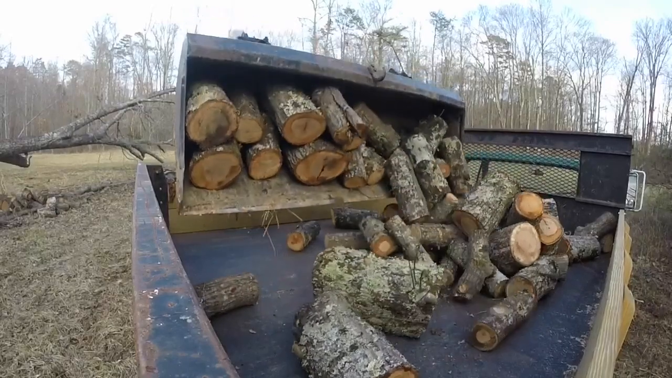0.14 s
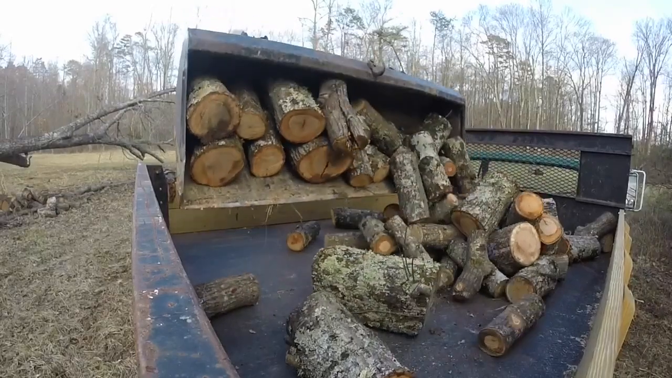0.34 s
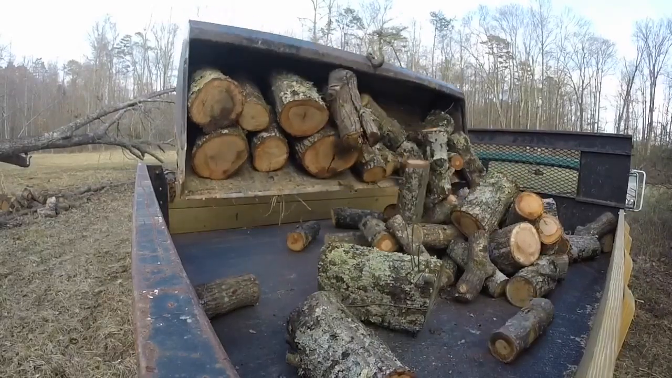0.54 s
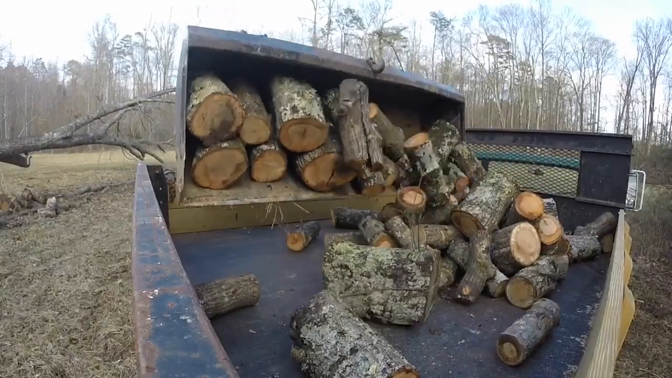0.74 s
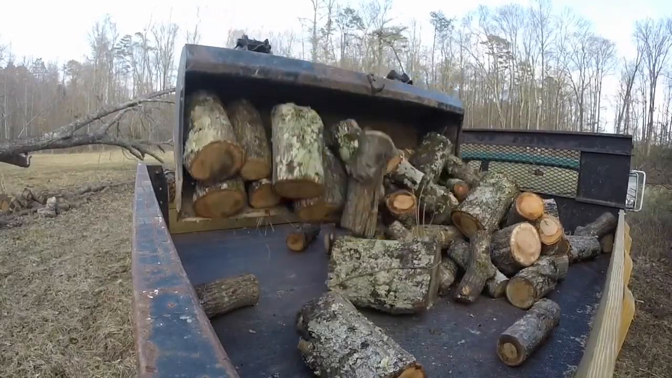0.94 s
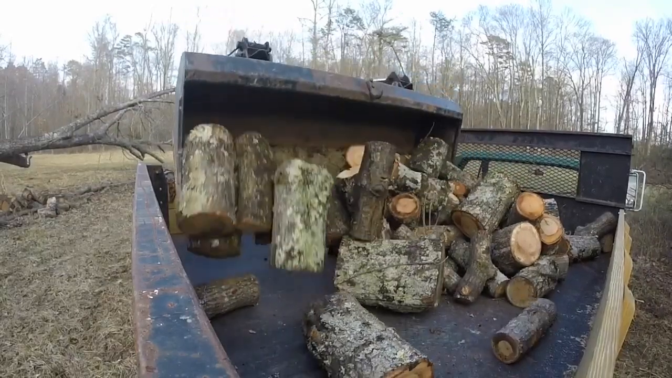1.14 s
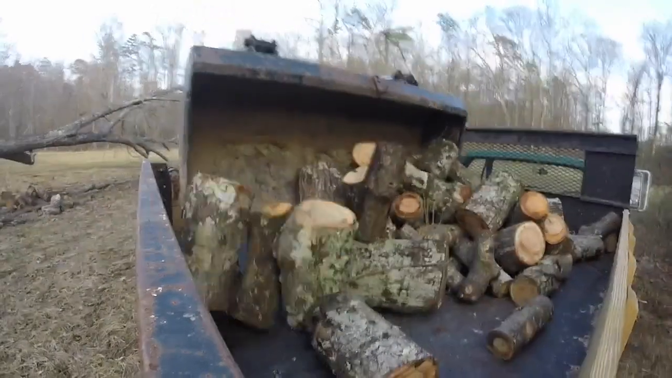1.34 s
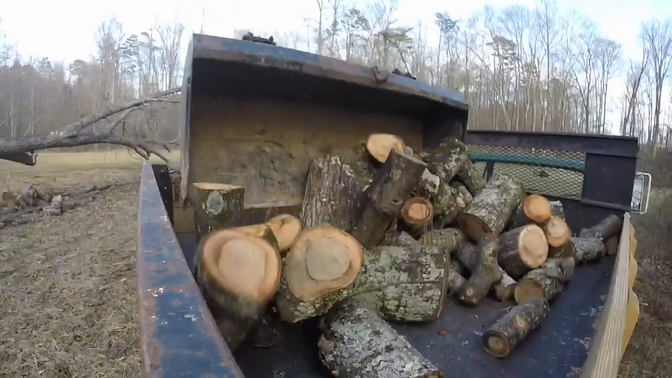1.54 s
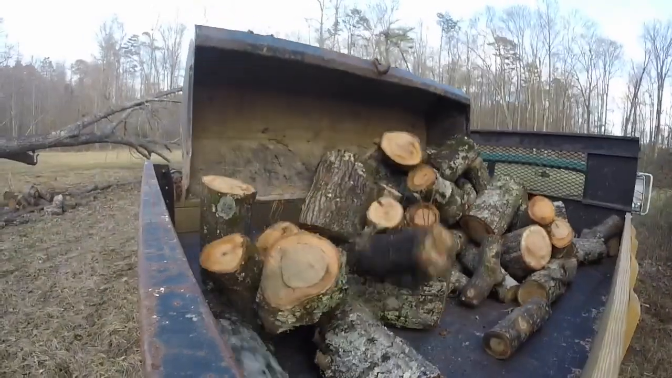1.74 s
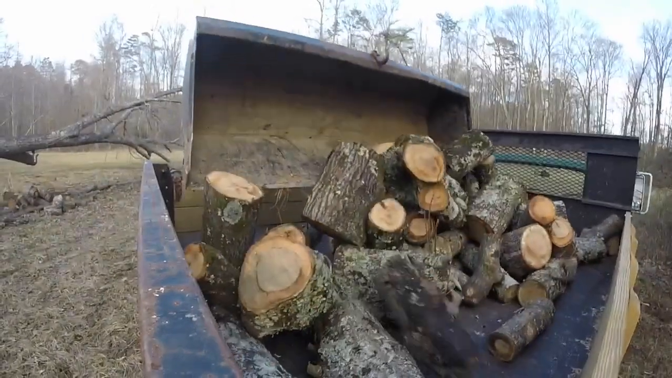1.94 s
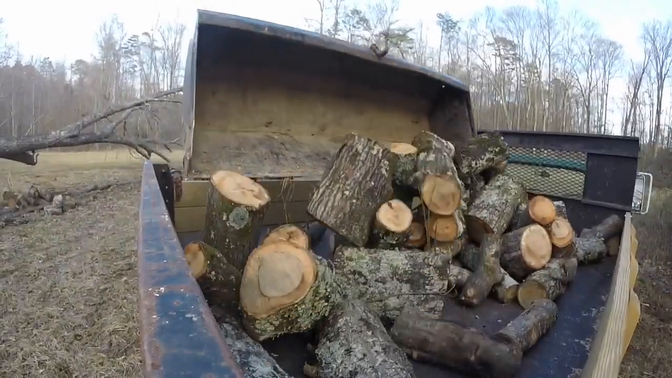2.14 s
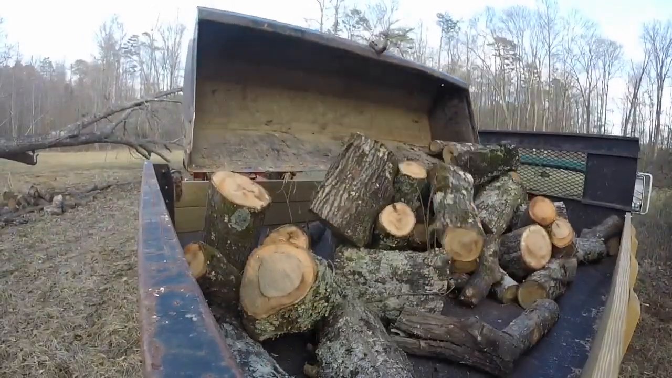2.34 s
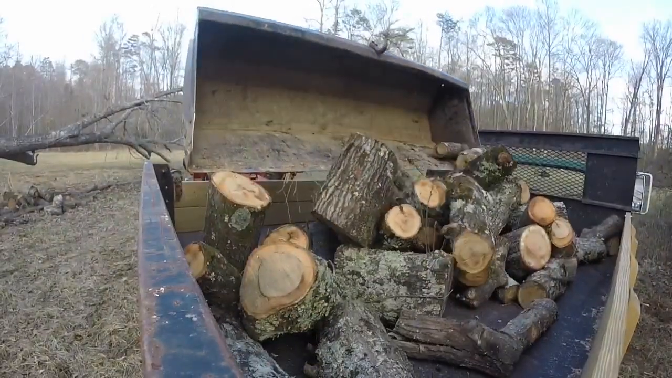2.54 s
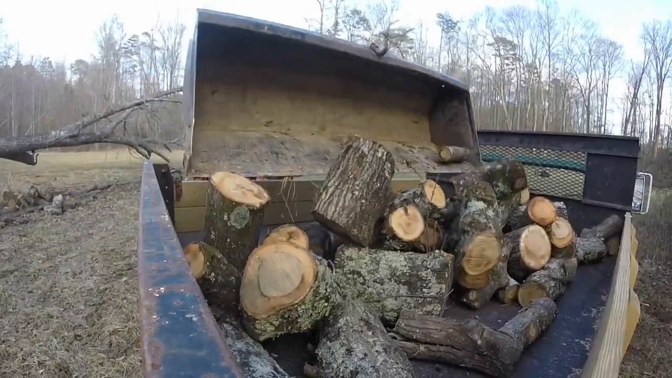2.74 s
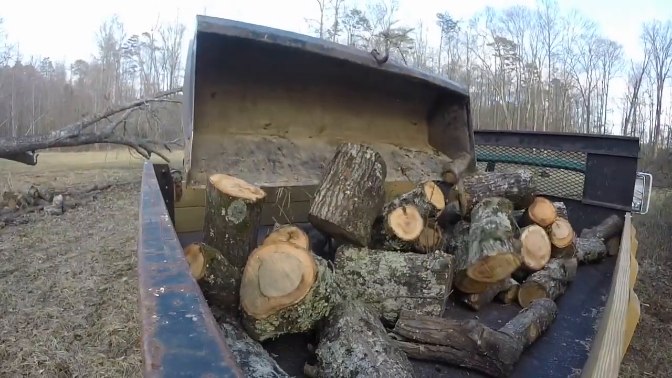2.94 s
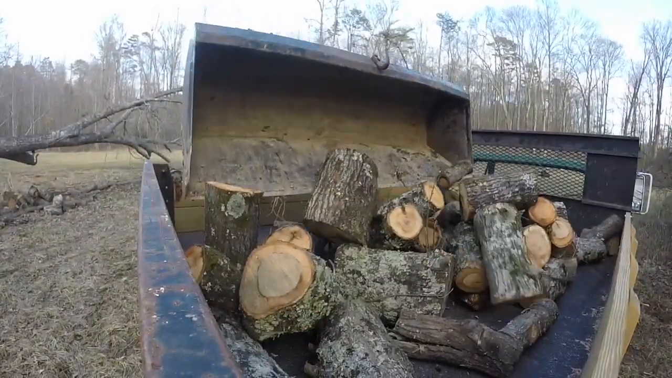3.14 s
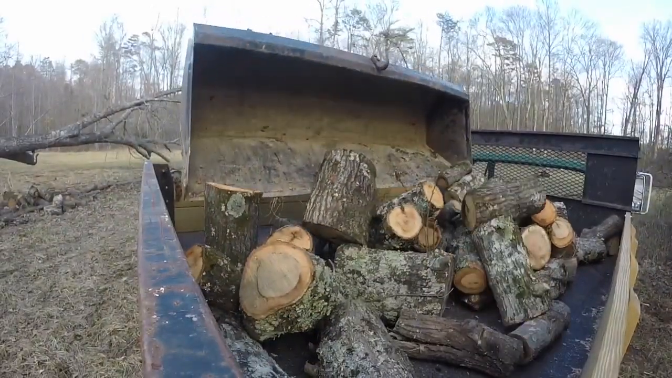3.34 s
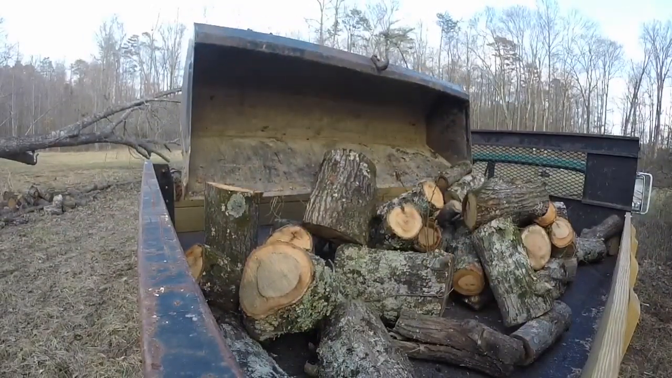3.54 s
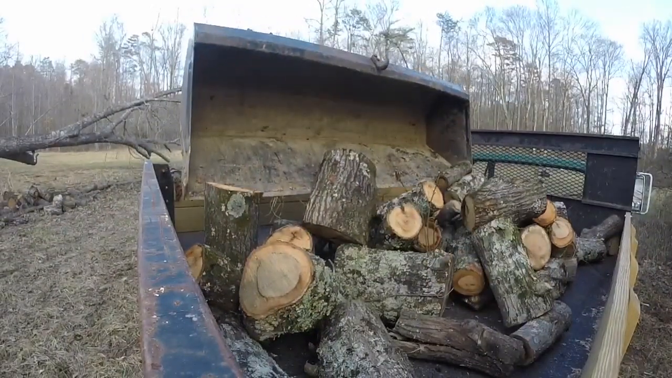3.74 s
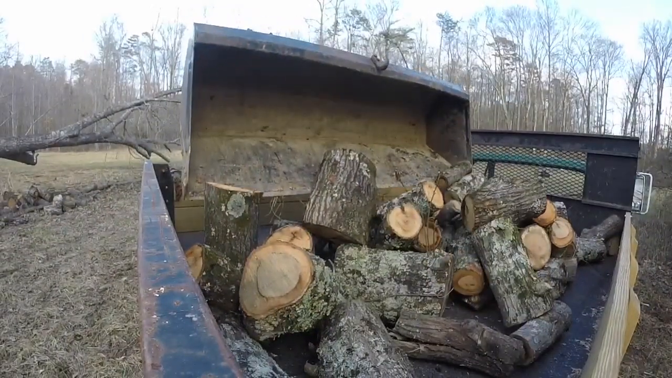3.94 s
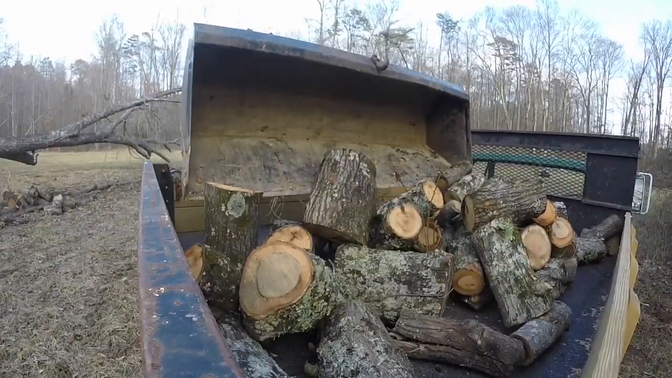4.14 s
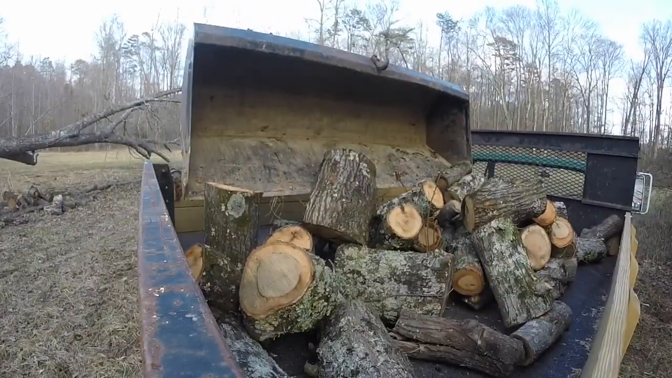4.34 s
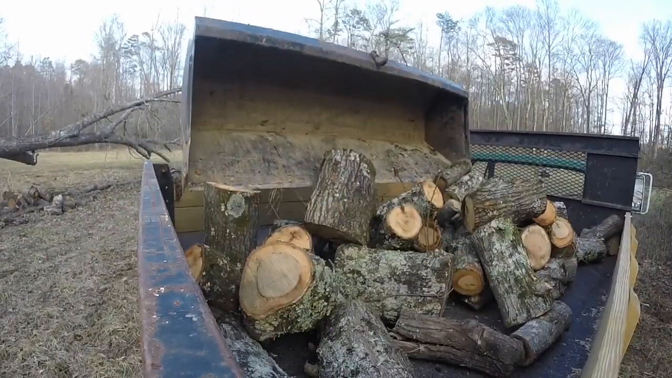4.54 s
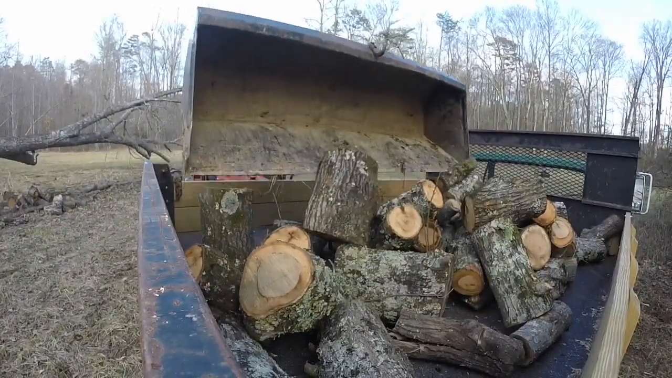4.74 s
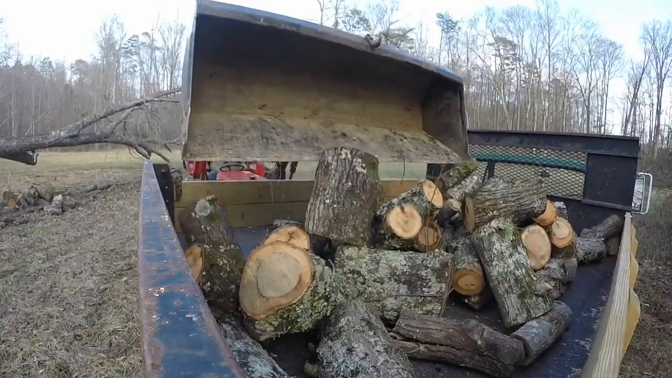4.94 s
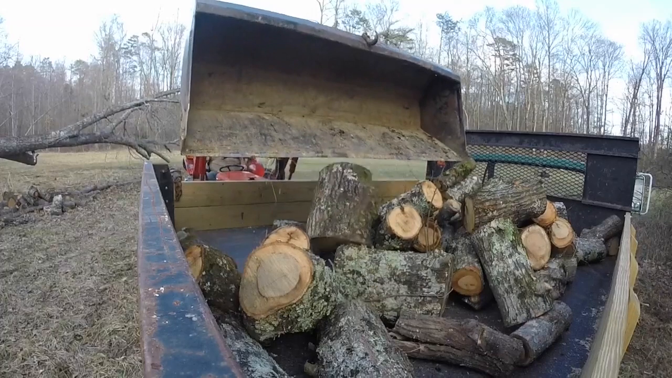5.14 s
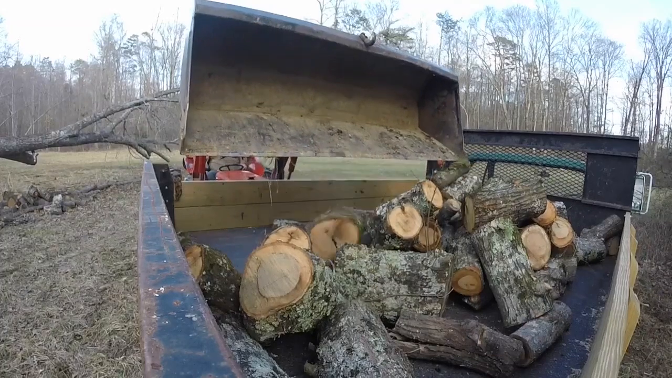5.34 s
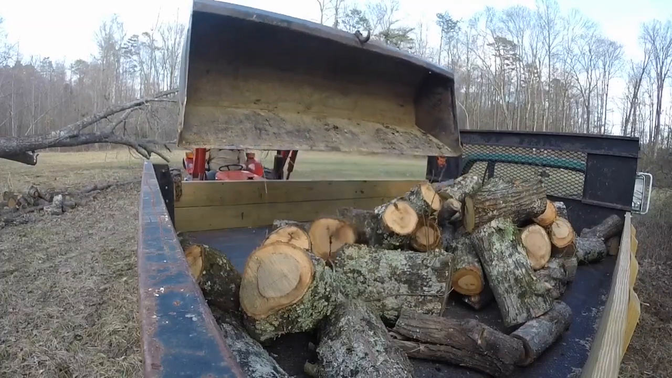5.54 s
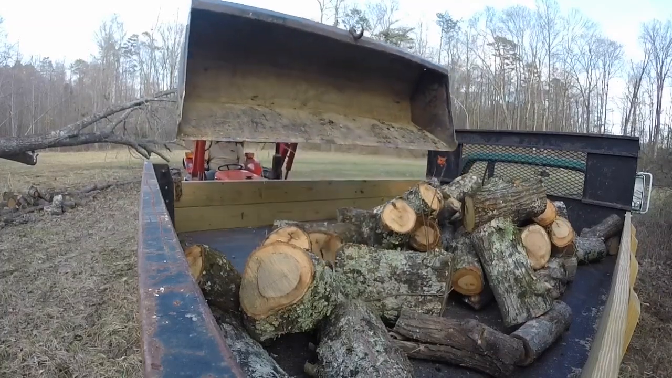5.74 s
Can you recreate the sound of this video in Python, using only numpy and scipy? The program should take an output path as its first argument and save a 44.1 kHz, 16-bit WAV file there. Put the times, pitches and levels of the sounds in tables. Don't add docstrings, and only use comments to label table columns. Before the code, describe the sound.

Split firewood crashes and rolls in a metal truck bed, the camera housing rattling with the jolts, while a diesel engine idles behind.

```python
import sys
import numpy as np
from scipy import signal
from scipy.fft import rfft, irfft
from scipy.io import wavfile
from scipy.ndimage import uniform_filter1d

SR = 44100
rng = np.random.default_rng(int(sys.argv[2]) if len(sys.argv) > 2 else 0)


def int16_out(signal):
    q = np.round(np.clip(np.atleast_2d(signal).T, -1, 1) * 32767)
    wavfile.write(sys.argv[1], SR, q.astype(np.int16))


def invert_db(level):
    return 10 ** (np.asarray(level, dtype=float) / 20)


N = 259308


def rms_one(x):
    return x / np.sqrt(np.mean(x ** 2) + 1e-20)


def in_time(rows):
    s, *columns = np.transpose(rows)
    return [np.interp(np.arange(N) / SR, s, c) for c in columns]


def drift(rate):
    return rms_one(np.interp(np.arange(N) * rate / SR, np.arange(999), rng.standard_normal(999)))


def cut(x, hz, kind="low", order=2):
    return signal.sosfilt(signal.butter(order, hz, kind, fs=SR, output="sos"), x)


def ring(clicks, hz, t60):
    r, w = invert_db(-60 / (t60 * SR)), 2 * np.pi * hz / SR
    return signal.lfilter([0, np.sin(w)], [1, -2 * r * np.cos(w), r * r], clicks + 1e-18)


def colour(x, spectrum):
    hz, level_db = np.transpose(spectrum)
    grid = np.linspace(1, SR / 2, 2049)
    cepstrum = irfft(np.log(invert_db(np.interp(np.log(grid), np.log(hz), level_db))))
    cepstrum[1:2048] *= 2
    cepstrum[2049:] = 0
    response = irfft(np.exp(rfft(cepstrum)))
    return signal.fftconvolve(x, response / np.linalg.norm(response))[:N]


def grains(per_s, spread_db):
    sizes = invert_db(spread_db * np.minimum(rng.exponential(1, N), 4)) * rng.choice([-1, 1], N)
    return sizes * (rng.random(N) < per_s / SR)


def strike(rows, modes, vary_db, reach=None):
    rows, out = np.array(rows), np.zeros(N)
    luck = rng.standard_normal((len(rows), len(modes)))
    for k, (hz, level_db, t60) in enumerate(modes):
        clicks = np.zeros(N)
        db = rows[:, 1] + level_db + vary_db * luck[:, k]
        if reach:
            db = db - reach * np.log2(rows[:, 2] / hz) ** 2
        np.add.at(clicks, (rows[:, 0] * SR).astype(int), invert_db(db) * (-1) ** k)
        out += ring(clicks, hz, t60)
    return out


def blows(rows, rise_cycles, crunch_db, crunch_t60, crunch_colour):
    tone, envelope = np.zeros(N + SR), np.zeros(N + SR)
    for s, db, hz, t60 in rows:
        t = np.arange(int(abs(t60) * SR) + 99) / SR
        at = slice(int(s * SR), int(s * SR) + len(t))
        rise = 1 - np.exp(-2 * t * hz / rise_cycles)
        tone[at] += invert_db(db - 60 * t / t60) * rise * np.sin(2 * np.pi * hz * t)
        envelope[at] += invert_db(db - 60 * t / min(t60, crunch_t60)) * (1 - np.exp(-t / 0.0025))
    crunch = colour(envelope[:N] * rng.standard_normal(N), crunch_colour)
    return tone[:N] + invert_db(crunch_db) * crunch


# start_s, peak_db, pitch_hz, t60_s (seconds to fall 60 dB)
BOOMS = [(0.0, -14.5, 99.6, 0.4), (.028, -9.5, 112, 0.12), (.186, -13, 114, 0.37), (.645, -14.5, 151, 0.19),
         (.685, -25, 129, 0.14), (.707, -10.5, 70, 0.11), (.735, -10.5, 120, 0.17), (.842, -6, 100, 0.19),
         (.932, -4, 124.7, 0.43), (.934, -28, 347, 0.16), (.985, -9, 70.4, 0.43), (1.012, -8.5, 119.3, 0.5),
         (1.02, -19, 232, 0.4), (1.045, -15, 78.5, 0.56), (1.069, -4.5, 130, 0.17),
         (1.604, -10, 94.6, 0.14), (1.896, -30, 130, 0.17), (2.38, -16, 166.7, 0.53),
         (2.535, -19.5, 126.7, 0.48), (2.645, -17, 91, 0.4), (2.84, -10.5, 198, 0.08),
         (2.974, -14.5, 107.3, 1), (3.189, -14.5, 130.8, 0.67), (3.313, -10.5, 147.5, 0.15),
         (4.514, -14.5, 114.8, 0.71), (4.518, -20.5, 178.6, 1.1), (4.553, -32, 312, 0.75),
         (4.563, -12.5, 180.4, 0.52), (4.585, -14, 122, 0.6), (4.66, -14.5, 132.6, 0.97),
         (4.71, -18, 97, 1.53), (4.794, -18, 122, 1.1), (5.147, -15, 314, 0.11), (5.358, -6, 105.3, 0.13),
         (5.545, -9.5, 80.6, 0.2), (5.597, -18, 86, 0.19), (5.691, -14, 142, 0.092)]
# start_s, peak_db, pitch_hz
THUMPS = [(0.252, -8.5, 102), (0.838, -9.5, 185), (1.189, -14.5, 125), (1.245, -5.5, 268), (1.275, -1, 193),
          (1.291, -9.5, 145), (1.365, -9, 98), (1.397, -9, 108), (1.415, -26, 170), (1.7843, -3, 147.4),
          (2.01, -8.5, 140), (2.168, -3.5, 267), (2.181, -5.5, 201), (2.221, -22.5, 115),
          (2.269, -16.5, 123), (2.453, -19, 123), (2.492, -18, 118), (2.751, -12.5, 117), (3.025, -17, 189),
          (3.098, -23, 97), (3.159, -21, 104), (3.233, -3, 129), (3.282, -15, 135), (3.22, -13.5, 158),
          (4.973, -27, 137), (5, -19, 106), (5.069, -8.5, 191), (5.095, -0.5, 105.6), (5.23, -25, 114),
          (5.66, -10.5, 83), (5.76, -25, 108)]
THUMP_CYCLES = 12.5
# pitch_hz, level_db, t60_s
BED = [
    (55, 4, 0.26),
    (97, 1, 0.11),
    (122, -9, 0.48),
    (177.2, -8, 1),
    (251, -13.5, 0.19),
    (327.3, -5.5, 0.26),
    (455.3, -3.5, 0.12),
]


def thuds():
    falls = BOOMS + [(s, db, hz, THUMP_CYCLES / hz) for s, db, hz in THUMPS]
    crunch = [(40, -15.0), (150, 3.5), (400, -3.0), (1000, -34.0),
              (2500, -37.5), (6000, -68.0), (16000, -120)]
    thumps = blows(falls, rise_cycles=0.72, crunch_db=-6.0, crunch_t60=0.14, crunch_colour=crunch)
    short_note = (216, 8.7, 0.018)
    panels = cut(strike(falls, BED + [short_note], 0.39, reach=5.6), 730, order=3)
    return invert_db(2.0) * thumps + invert_db(-9.5) * panels


# start_s, peak_db, pitch_hz
CHIPS = [(.119, -33, 2580), (.264, -29, 3270), (.265, -26, 2350), (.35, -33, 2950), (.35, -44, 4600),
         (.415, -28, 2710), (.417, -36, 4580), (.608, -32, 2320), (.612, -33, 2940), (.654, -38, 4450),
         (.654, -35, 3700), (.754, -14, 2410), (.762, -22, 1546), (.764, -21, 2980), (3.195, -18, 2790),
         (3.197, -27, 2170), (3.233, -20, 2520), (3.934, -19.5, 1490), (4.268, -23.5, 1520),
         (4.503, -13, 2294), (4.512, -9.5, 2610), (4.52, -23, 3020)]
CHIP_T60_S = 0.047


def chip_pings():
    out, t = np.zeros(N + SR), np.arange(SR // 5) / SR
    for s, db, hz in CHIPS:
        pair = np.sin(2 * np.pi * hz * t) + 0.43 * np.sin(2 * np.pi * 1.035 * hz * t)
        envelope = invert_db(db - 60 * t / CHIP_T60_S) * (1 - np.exp(-t / 0.0011))
        out[int(s * SR):int(s * SR) + len(t)] += envelope * pair
    return out[:N]


# start_s, peak_db, pitch_hz, t60_s
KNOCKS = [(.01, -9.5, 1580, 0.06), (.265, -17.5, 1280, 0.3), (0.604, -15, 903, 0.16),
          (.854, -12.5, 508, 0.092), (.899, -26, 660, 0.079), (.993, -13, 1133, 0.093),
          (1.125, -18.5, 725, 0.052), (1.255, -16, 960, 0.43), (1.315, -30, 1590, 0.71),
          (1.367, -7.5, 1453, 0.18), (1.448, -19.5, 1377, 0.21), (1.697, -9, 1580, 0.1),
          (1.787, -12.5, 1080, 0.033), (2.013, -15.5, 756, 0.3), (2.169, -18, 595, 0.03),
          (2.174, -14.5, 1075, 0.087), (2.782, -23.5, 1665, 0.1), (2.797, -23, 1523, 0.11),
          (3.198, -6, 1048, 0.058), (3.235, -10, 1038, 0.074), (4.505, -12, 1240, 0.14),
          (5.105, -9, 1642, 0.14), (5.664, -18, 670, 0.14), (5.69, -8, 1566, 0.14)]
# start_s, peak_db, pitch_hz
CLACKS = [(0.034, -14.5, 904), (.067, -12.5, 1570), (.118, -15.5, 742), (0.122, -19, 1660),
          (.59, -18, 1040), (.749, -10.5, 2240), (1.054, -10.5, 730), (1.053, -19, 1720),
          (1.081, -23, 1730), (1.128, -22, 1780), (1.152, -17, 1530), (1.274, -3.5, 1533), (1.28, -6, 786),
          (1.421, -7.5, 1330), (1.672, -9, 1370), (1.745, -10, 770), (1.934, -15.5, 1345), (2.33, -22, 964),
          (2.498, -33, 1006), (2.659, -19, 1540), (2.874, -25.5, 1620), (3.195, -14.5, 1660),
          (3.272, -12, 1155), (3.254, -12, 1570), (3.476, -30, 885), (4.338, -20, 1170),
          (4.446, -14.5, 1196), (4.462, -14.5, 1020), (4.827, -32, 940), (4.923, -21, 950),
          (5.07, -13.5, 910), (5.191, -16, 850), (5.22, -38, 1650), (5.274, -17.5, 1590), (5.31, -24, 1620),
          (5.394, -8.5, 778), (5.419, -16, 1580), (5.548, -17, 804)]
CLACK_T60_S, CRACK_T60_S = 0.037, 0.13
# start_s, peak_db, pitch_hz, t60_s
RINGS = [
    (.756, -8, 942, 0.11),
    (.76, -9.5, 1168, .07),
    (2.933, -15, 1010, 0.23),
    (4.506, -0.5, 960, 0.071),
    (4.518, -4.5, 1114, 0.17),
    (4.532, -7, 1020, .08),
    (4.553, -8.5, 1163, 0.086),
    (4.662, -10, 952, 0.081),
    (4.668, -15.5, 1118, 0.16),
]
RING_WOBBLE_DB = 3.5
# times_pitch, level_db
OVERTONES = [
    (1.701, -16.5),
    (2.6, -19),
]
# pitch_hz, level_db, t60_s
LOG = [
    (617, -19.5, 0.088),
    (960, -3.5, 0.19),
    (1103, -1, 0.12),
    (1580, -3.5, 0.12),
    (1920, 0, 0.14),
    (2560, -10, 0.099),
]


def knocks():
    hits = KNOCKS + [(s, db, hz, CLACK_T60_S) for s, db, hz in CLACKS]
    upper = [(s, db + less_db, hz * times, t60 / times)
             for s, db, hz, t60 in KNOCKS for times, less_db in OVERTONES]
    crunch = [(200, -4.5), (500, 2.5), (1100, 0.5), (1700, -7.0), (2600, -11), (3500, -22),
              (5500, -37.0), (8000, -37.5), (11500, -83), (16000, -120)]
    snap = cut(strike(hits, [(1300, 0.5, 0.0043)], 3.6), 3200)
    singing = chip_pings() + blows(RINGS, 1.7, -11.5, CRACK_T60_S, crunch)
    singing = invert_db(RING_WOBBLE_DB * drift(120)) * singing
    notes = blows(hits + upper, 0.65, -0.51, CRACK_T60_S, crunch)
    shared = cut(strike(hits, LOG, 1.0, reach=152.0), 2400)
    return invert_db(-2.5) * notes + invert_db(-2.5) * shared + singing + snap


# start_s, peak_db,
# brightness_db
TICKS = [(0.0122, -21.5, -7), (0.028, -20, -5), (.3505, -36, -9), (.751, -26, -12), (0.9904, -34, 4),
         (1.0628, -31.5, 8.5), (1.0773, -37, 0), (1.1367, -26.5, -14), (1.248, -33, -10), (1.258, -23, -9),
         (2.7967, -38, -12), (3.192, -20.5, -13), (3.232, -23, -17), (3.2396, -23, -14), (3.2503, -27, -6),
         (3.2607, -25, -10), (3.2748, -34, -4), (3.287, -41, -14), (3.3214, -44, -13), (3.3299, -40, -13),
         (3.3716, -40, 4), (3.424, -41, -10),
         (1.271, -19.5, -12), (1.2825, -21.5, -12), (1.291, -24, 13.5), (1.297, -29, 4), (1.3012, -10, 4),
           (1.3135, -35, -5), (1.321, -21, -6), (1.3287, -25, -10), (1.338, -10, 6), (1.3563, -9.5, -2),
           (1.362, -25, -7), (1.37, -15, -10), (1.378, -19, 9.5), (1.3889, -13.5, 4), (1.401, -23.5, 11.5),
           (1.409, -15.5, 4), (1.4281, -15, 0), (1.4393, -27, 0), (1.4467, -19, 3), (1.4607, -26.5, 2),
           (1.47, -27, -4), (1.4774, -22.5, 3), (1.4926, -27, 2), (1.5036, -31.5, -9), (1.511, -29, -4),
           (1.5166, -33, 0), (1.5253, -30, 14), (1.5356, -29, -9), (1.5404, -32, -10), (1.5502, -23.5, 3),
           (1.5574, -22, -5), (1.5677, -25, 10), (1.5733, -38, -1), (1.5814, -38, 4), (1.586, -29, -11),
           (1.6177, -28, -15), (1.626, -19.5, 5), (1.6396, -35, 10), (1.6551, -40, -8),
         (1.6641, -31, -2), (1.6758, -19, -3), (1.684, -19, 6), (1.696, -20, 5), (1.701, -27, -6),
            (1.715, -23, -11), (1.7254, -34, -2), (1.7305, -36, 8), (1.736, -32, -13), (1.7453, -35, 3),
            (1.7527, -31, 9), (1.7666, -38, -10), (1.79, -25, 11), (1.7956, -21, -3), (1.8085, -24, 9.5),
            (1.8221, -33, -3), (1.8281, -30, -6), (1.834, -27, -3), (1.8464, -21.5, 8), (1.8595, -35, -7),
            (1.87, -20, -8), (1.8808, -18, 10.5), (1.8937, -33, -12), (1.8985, -37, -7), (1.919, -22, 2),
            (1.9405, -24.5, 5), (1.9572, -24, 0), (1.9775, -21.5, -9), (1.999, -25, -3), (2.01, -26, -6),
            (2.019, -31, -9), (2.0275, -28, 9.5), (2.0364, -31, -8), (2.048, -25, -14), (2.0675, -28, -10),
            (2.0732, -24.5, -5), (2.0837, -34, -12), (2.094, -28, -11), (2.1015, -26.5, -19),
            (2.1134, -36, -15), (2.1282, -34, -13), (2.193, -23, -1), (2.2116, -24.5, -7), (2.24, -38, -10),
            (2.2534, -39, -14), (2.336, -32, -15),
         (4.505, -22, -7), (4.517, -15, -13), (4.5314, -25, -7), (4.6373, -37, -8), (4.66, -31.5, -13),
            (4.6775, -34, -19), (4.9668, -43, 12.5), (5.07, -36, 5), (5.077, -26, 1), (5.085, -19.5, -10),
            (5.1, -25, -10), (5.1105, -17.5, -12), (5.1182, -5, 6), (5.1246, -25, 5), (5.1295, -15, -1.5),
            (5.136, -28, -7), (5.1406, -12.5, -8), (5.1478, -14, 14.5), (5.17, -20.5, -6), (5.176, -33, -4),
            (5.194, -29.5, -1), (5.2102, -23.5, -9), (5.227, -28, 1), (5.24, -26, -10), (5.2513, -25, 1),
            (5.2632, -25.5, 6), (5.2843, -39, -8), (5.293, -31.5, -10), (5.308, -32.5, -1),
            (5.3258, -36, -5), (5.3754, -29, 3), (5.383, -27, -9), (5.39, -32, -7), (5.399, -28.5, -15),
            (5.4066, -32, -6), (5.4146, -39, 10), (5.425, -34, -3), (5.4543, -43, -8), (5.515, -43, -12),
            (5.5616, -36, -10), (5.588, -31.5, -14), (5.6076, -40, -11), (5.6657, -34, -6),
            (5.671, -22, -2), (5.6811, -19.5, 9), (5.701, -21, 3), (5.7035, -38, -13), (5.7126, -18.5, -5),
            (5.7322, -40, -11), (5.7366, -32, 10), (5.76, -39, -1), (5.786, -36, -7), (5.849, -39, 11)]
# pitch_hz, level_db (per Hz)
HOUSING = [(1290, 3), (2200, -11.5), (2590, -4.5), (3310, -1), (3690, 2), (4310, -1), (4690, -4.5),
           (5030, -4.5), (5510, 2), (6530, -9.5), (7310, -23.5), (7850, -29.5), (8730, -23.5),
           (10900, -21.5), (11900, -50.5), (15000, -53.5), (22000, -120)]
# pitch_hz, level_db, t60_s
SHELL = [
    (3700, -7, 0.0056),
    (4670, -2.5, 0.02),
    (5480, -4, 0.014),
    (7730, -9, 0.0049),
    (10250, -14.5, 0.0024),
]
BUZZ_SWELL_DB = 2.5


def housing(buzz_db):
    rows = np.array(TICKS)
    at, level_db = ((rows[:, 0] - .0008) * SR).astype(int), rows[:, 1]
    t = np.arange(SR // 10) / SR
    shape = (1 - np.exp(-t / 0.0019)) ** 2 * (invert_db(6.5 - 60 * t / 0.013) + invert_db(-15 - 60 * t / 0.068))
    tiny = rms_one(rng.standard_normal(N) + .5 * grains(900 * invert_db(11 * drift(60)), 4))
    out = 0
    for k, kind in enumerate(["low", "high"]):
        clicks = np.zeros(N)
        np.add.at(clicks, at, invert_db(level_db + k * rows[:, 2]))
        scuffs = invert_db(4.5) * signal.fftconvolve(clicks, shape)[:N] * rng.standard_normal(N)
        buzz = invert_db(buzz_db - 11 * k + BUZZ_SWELL_DB * drift(25)) * tiny
        out += cut(scuffs + buzz, 8200, kind, order=4)
    singing = sum(invert_db(db) * ring(out, hz, 2 * t60) for hz, db, t60 in SHELL + [(2647, 2.4, 0.025)])
    shell = invert_db(-34.5) * singing + invert_db(-10.5) * strike(rows, SHELL, 3.7)
    return colour(out, HOUSING) + cut(shell, 10900, order=6)


# pitch_hz, level_db (per Hz)
GRIND = [
    (200, -25.5),
    (330, 0.5),
    (700, -10.5),
    (1150, -8.5),
    (1500, 0.5),
    (1900, -6.5),
    (2300, -20.5),
    (3300, -24.5),
    (4500, -45.5),
    (9000, -120),
]


def pile(rumble_db, panel_db, grind_db):
    nudges = grains(150, 1.6)
    floor = BED[1:3] + BED[4:]
    rumble = sum(invert_db(db) * ring(nudges * rng.standard_normal(N), hz, t60) for hz, db, t60 in floor)
    rumble = rms_one(cut(rumble, 760, order=4))
    panel = ring(rng.standard_normal(N), BED[3][0], 0.3)
    panel /= np.sqrt(uniform_filter1d(panel ** 2, SR // 12) + 1e-9)
    grind = rms_one(colour(grains(4000 * invert_db(2.6 * drift(30)), 3.0), GRIND))
    return invert_db(rumble_db - 6.0) * rumble + invert_db(panel_db) * panel + invert_db(grind_db - 3.0) * grind


# time_s, level_db
ENGINE = [(0, -31), (.3, -33), (.6, -28), (.9, -26), (1.2, -34.5), (1.6, -27.5), (2.2, -27.5), (2.6, -38),
          (2.9, -30.5), (3.2, -30), (3.5, -33.5), (3.75, -28.5), (4.45, -27.5), (5.0, -29.5), (5.25, -28),
          (5.55, -36), (5.88, -29)]
# pitch_hz, level_db (per Hz)
CLATTER = [(65, -51.5), (110, -8.5), (187, -2.5), (223, -10), (425, -4.5), (488, -10.5), (630, -3.5),
           (1010, -2), (1230, -4), (2000, -21.5), (2790, -23.5), (3970, -47.5), (5650, -38), (11900, -74.5),
           (15500, -90), (22000, -120)]
FIRING_HZ, A_FIRING_S = 19.2, 4.003
EXHAUST_DB, EXHAUST_FOLLOWS = -31.5, 0.38
EXHAUST_DUCK = 0.29
KNOCK_DB, KNOCK_T60_S = 2, 0.046


def engine():
    clatter_db, = in_time(ENGINE)
    effort_db = uniform_filter1d(in_time(SLIDING)[0], SR // 3)
    exhaust_db = EXHAUST_DB + EXHAUST_FOLLOWS * (clatter_db + 30.5) - EXHAUST_DUCK * (effort_db + 38)

    turns = FIRING_HZ * (np.arange(N) / SR - A_FIRING_S)
    fired = np.diff(np.floor(turns), prepend=np.floor(turns[0])) * invert_db(0.7 * drift(31))
    fired = fired + 0.013 * rng.standard_normal(N)
    exhaust = rms_one(cut(ring(fired, 64, .045), 150, order=4))

    stroke_db = 1.1 * np.cos(2 * np.pi * (turns - .1)) + .8 * np.cos(4 * np.pi * (turns - .15))
    stroke_db = stroke_db + .8 * drift(14)
    clatter = rms_one(colour(rng.standard_normal(N) + 0.11 * grains(850, 2.6), CLATTER))
    since_s = (turns - .47) % 1 / FIRING_HZ
    knock = cut(invert_db(KNOCK_DB + 3.6 * drift(7.3) - 60 * since_s / KNOCK_T60_S), 250)
    bright = cut(clatter, 2100, "high", order=3)
    clatter = clatter + bright * (invert_db(1.0) * (1 + knock) - 1)
    return invert_db(exhaust_db + 3.5) * exhaust + invert_db(clatter_db + 2.5 + stroke_db) * clatter


# time_s, level_db
VALVE = [
    (0, -66),
    (.4, -56),
    (.92, -47),
    (1.2, -57),
    (2.5, -65.5),
    (3.75, -59.5),
    (4.4, -57.5),
    (5.88, -68.5),
]
# time_s, rise_db
SPURTS = [
    (.45, 10),
    (.897, 6),
    (2.64, 11.5),
    (2.97, 12),
    (3.73, 5.5),
    (3.79, 10),
    (4.15, 10),
    (4.36, 11),
]
SPURT_S = .012


def valve():
    hiss = rms_one(cut(cut(rng.standard_normal(N), 6000, "high"), 5250, order=3))
    t = np.arange(N) / SR
    puffs_db = sum(db * np.exp(-((t - s) / SPURT_S) ** 2) for s, db in SPURTS)
    return invert_db(in_time(VALVE)[0] + puffs_db + 0.88 * drift(12)) * hiss


# time_s, floor_db, side_panel_db
ROLLING = [(0, -17.5, -38), (.56, -33, -31.5), (.92, -17, -22), (1.2, -26.5, -28.5), (1.35, -15, -36),
           (1.6, -23, -25.5), (2.05, -20, -34), (2.25, -21, -26.5), (2.6, -33, -26), (2.8, -16, -34.5),
           (3.1, -26, -20), (3.6, -36.5, -41), (4.4, -31, -52), (4.65, -20.5, -22), (4.95, -32, -25),
           (5.08, -15.5, -48), (5.3, -24, -48), (5.6, -18.5, -34)]
# time_s, effort_db (level of the bark grind)
SLIDING = [(0, -28), (.3, -36), (.8, -26.5), (1.22, -36.5), (1.3, -16), (1.6, -18.5), (2.15, -20.5),
           (2.45, -39.5), (3.13, -45.5), (3.25, -18.5), (3.4, -35.5), (4.8, -42.5), (5.06, -31.5),
           (5.14, -12.5), (5.3, -23.5), (5.55, -31.5), (5.72, -18.5), (5.88, -29.5)]
BUZZ_DB, BUZZ_FOLLOWS = -58, 0.98


def scene():
    rumble_db, panel_db = in_time(ROLLING)
    grind_db, = in_time(SLIDING)
    buzz_db = BUZZ_DB + BUZZ_FOLLOWS * (grind_db + 31.0)
    wood = knocks()
    dull = cut(wood, 4300)
    echoes = sum(invert_db(db) * np.pad(dull, (int(s * SR), 0))[:N] for s, db in [(.0113, -6.5), (.023, -9.5)])
    bed = thuds() + wood + echoes + pile(rumble_db, panel_db, grind_db)
    return (bed + housing(buzz_db) + engine() + valve())[None]


def roll_off(x):
    return signal.sosfilt(signal.butter(12, 15100, fs=SR, output="sos"), x)


def record(dry):
    mix = np.tanh(cut(dry, 41, "high") / 1.17)
    return roll_off(mix)


dry = scene()
out = record(dry)
int16_out(out)
```